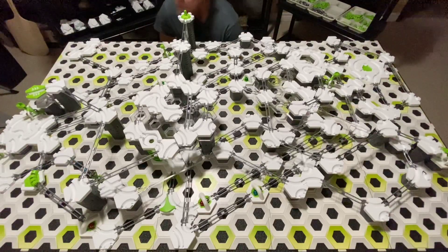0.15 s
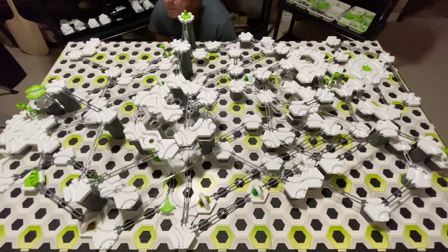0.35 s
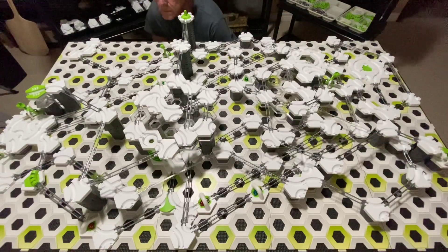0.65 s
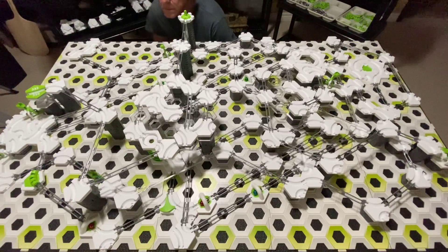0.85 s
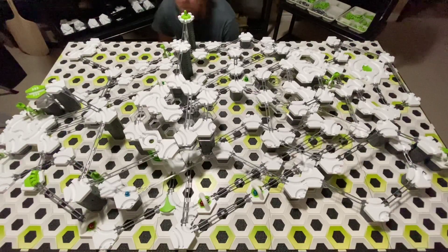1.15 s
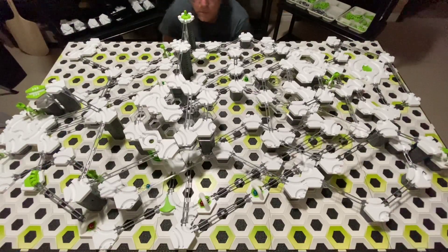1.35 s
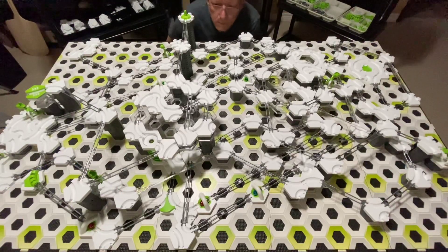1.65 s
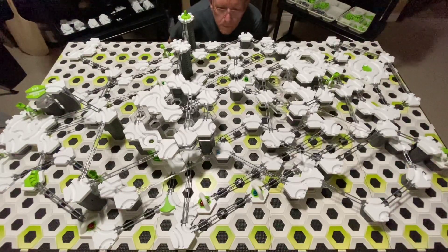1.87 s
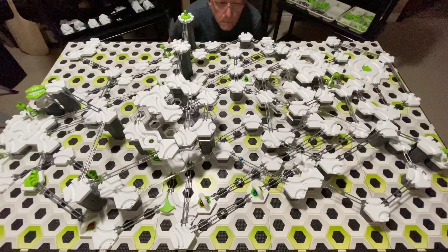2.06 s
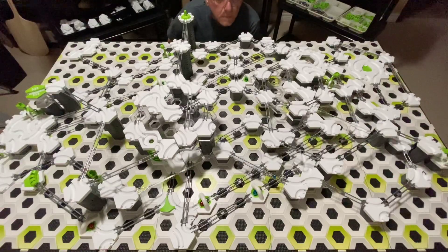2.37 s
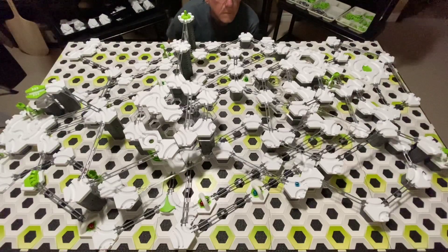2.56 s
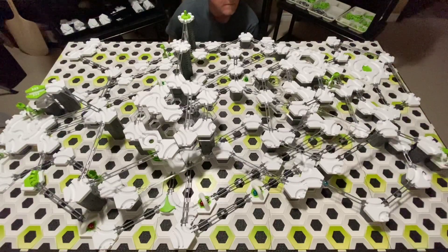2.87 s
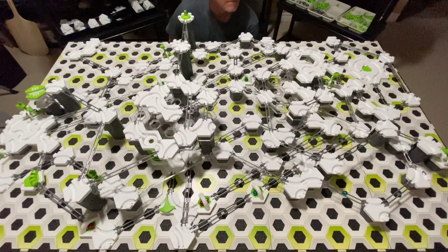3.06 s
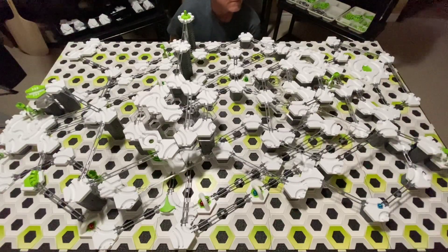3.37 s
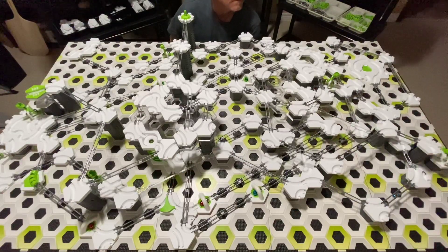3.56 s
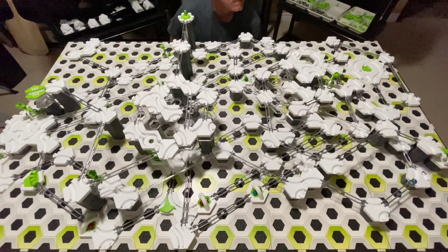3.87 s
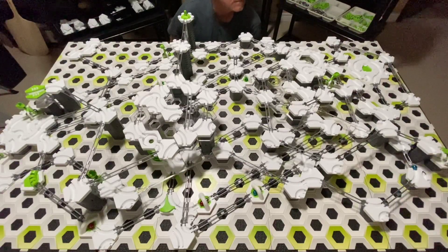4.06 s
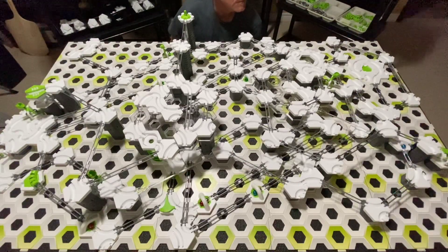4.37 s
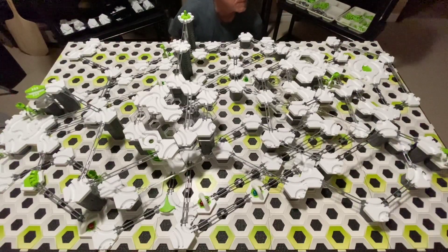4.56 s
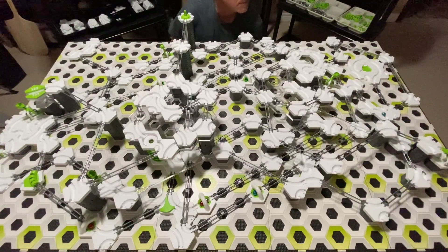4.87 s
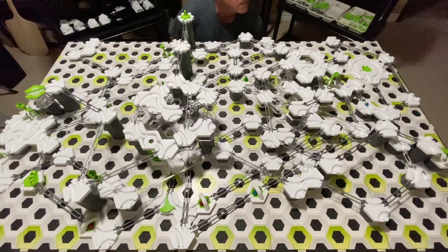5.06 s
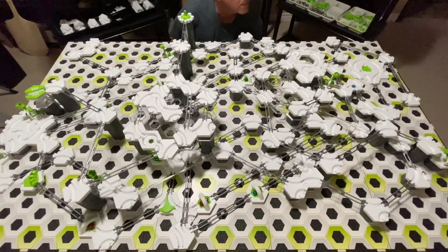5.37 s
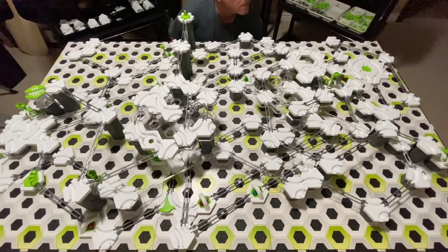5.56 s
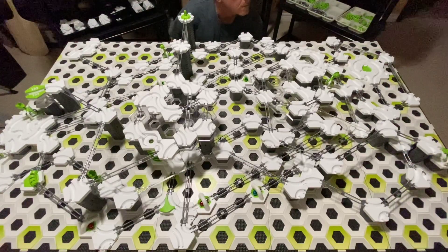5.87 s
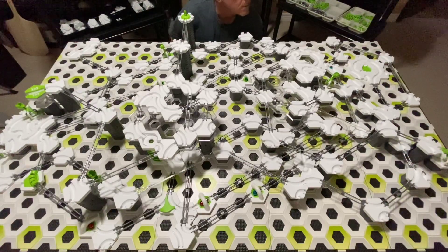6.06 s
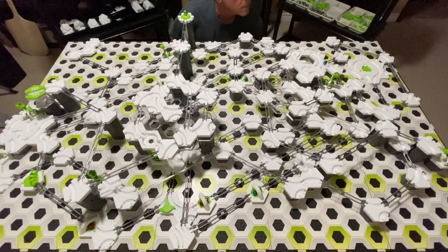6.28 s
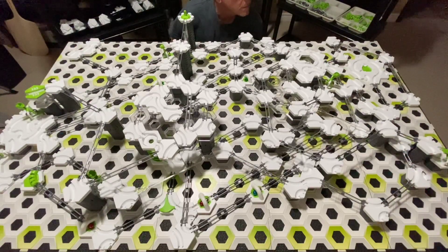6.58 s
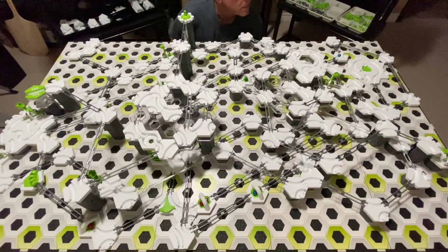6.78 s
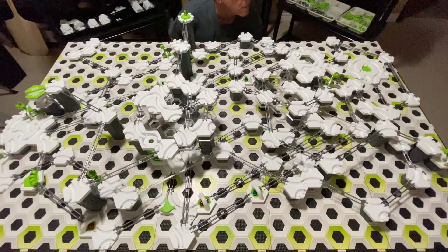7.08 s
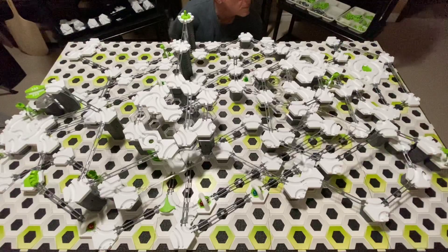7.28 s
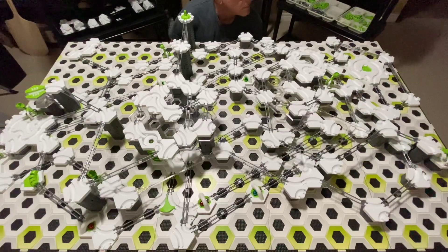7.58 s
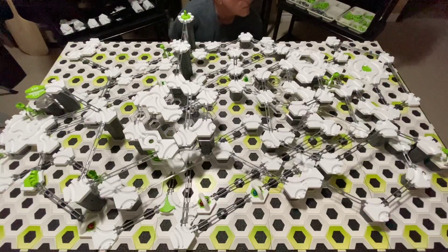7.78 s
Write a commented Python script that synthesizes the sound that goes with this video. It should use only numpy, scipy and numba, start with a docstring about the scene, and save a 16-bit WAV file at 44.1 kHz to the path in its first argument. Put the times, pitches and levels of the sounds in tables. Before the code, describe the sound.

Small steel marbles rattle and roll over hollow plastic track tiles and wire rails, with a sharp clack near one second, indoors.

```python
"""Small steel marbles run over a table-top track of hollow plastic tiles and wire rails in a furnished room.
Rolling is random grit exciting tile cavities, tile walls and rails; on some passes one resonance sings.
Knocks and bounces are short bursts of noise that ring the track's decaying modes, with diffuse reflections.
Passing marbles make the card base drone (noise through broad resonances) and shake the table into a rumble.
A low hum and rumble, also resonant noise, lie under it all, with faint hiss."""
import sys
import numpy as np
from scipy import signal
from scipy.io import wavfile
from scipy.ndimage import uniform_filter1d
from numba import njit

SR = 44100
rng = np.random.default_rng(int(sys.argv[2]) if len(sys.argv) > 2 else 0)


def unload_wav(signal):
    """Save mono or channel-first audio to the path in sys.argv[1] as 16-bit WAV at rate SR, clipped to [-1, 1]."""
    wavfile.write(
        sys.argv[1],
        SR,
        np.round(np.clip(np.atleast_2d(signal).T, -1, 1) * 32767).astype(np.int16),
    )


N = 349713

# Rolling, one list for each stretch of track:
# (time [s], tile cavity level [dB], tile rasp level [dB], rail hiss level [dB])
ROLLING_LEVELS = [
    [(0.0, -69, -63.5, -67), (0.03, -76.5, -71.5, -77.5), (0.28, -80.5, -72, -103)],
    [(0.3, -71, -78, -92), (0.526, -65, -56, -82), (0.83, -83.5, -86, -89)],
    [(0.98, -45, -56, -65), (1.038, -71, -72, -81), (1.3, -61.5, -67.5, -80)],
    [(1.32, -65, -64.5, -81), (1.462, -69.5, -68, -68), (1.89, -64.5, -58, -55.5)],
    [(1.92, -58, -53, -56), (1.956, -57.5, -58, -64), (2.2, -67, -74, -70), (2.47, -66, -72, -71)],
    [(2.49, -43.5, -63, -72), (2.596, -59, -61.5, -77), (2.9, -59, -68.5, -71)],
    [(2.92, -62.5, -67, -81), (3.08, -65.5, -71.5, -75), (3.25, -68.5, -68.5, -77.5)],
    [(3.27, -59.5, -64, -77), (3.52, -64, -68.5, -72.5), (3.7, -70.5, -70, -76), (3.77, -72, -77.5, -84.5),
     (3.83, -75, -77, -86)],
    [(3.85, -56, -61.5, -82), (4.104, -67, -73, -77), (4.62, -65.5, -71, -87.5)],
    [(4.72, -69, -84, -75), (4.74, -58.5, -74, -74), (4.98, -59.5, -72.5, -96)],
    [(5.04, -49, -63, -70), (5.06, -59.5, -70, -82), (5.36, -62.5, -69, -68)],
    [(5.39, -52.5, -67, -67), (5.658, -60.5, -68, -72), (5.73, -83.5, -89, -94)],
    [(5.75, -58.5, -72, -76), (5.88, -87, -81, -78), (5.91, -70, -78, -84)],
    [(5.93, -71, -84.5, -87), (6.19, -71, -93.5, -99), (6.26, -58, -84, -96), (6.44, -70.5, -95.5, -98.5)],
    [(6.47, -56, -90, -93), (6.48, -70, -83.5, -91.5), (7.17, -65.5, -71, -72)],
    [(7.19, -58.5, -62.5, -77.5), (7.52, -77, -87.5, -86.5), (7.65, -77.5, -90, -83),
     (7.69, -75, -80, -80.5), (7.93, -76, -78.5, -72)],
]
# Tile cavities under the marble: (time [s], pitch [Hz])
CAVITY_PITCH = [(0, 1872), (.96, 1888), (1.08, 1740), (1.88, 1414), (2.03, 1294), (2.1, 1520), (2.48, 1556),
                (2.5, 1875), (2.84, 1361), (2.92, 1655), (3.9, 1636), (4.02, 1420), (4.2, 1653),
                (4.6, 1586), (4.8, 1759), (5.1, 1621), (5.92, 1732), (6.04, 1412), (6.93, 1297),
                (7.02, 1720), (7.93, 1541)]
# Wire rails: (time [s], pitch [Hz])
RAIL_PITCH = [(0, 4576), (1.3, 5046), (2.1, 4810), (2.7, 4700), (4.2, 5120), (5.4, 4650), (7.93, 4520)]
# Tile-wall resonances in the rasp: (pitch [Hz], first-stage width [Hz], relative level [dB])
RASP_RESONANCES = [(2570, 450, 6), (2890, 900, 7.5), (3440, 280, -5)]
# Card-base resonances: (pitch [Hz], first-stage width [Hz], relative level [dB])
BASE_RESONANCES = [(274, 76, -2), (358, 129, 3), (458, 220, 0.5), (660, 220, -11.5)]
# Passes that set the card base droning: (start [s], time held from start [s], level [dB])
DRONE_PASSES = [(.38, 0.12, -72.5), (.5, 0.14, -70), (0.919, 0.0086, -45), (0.999, 0.14, -68.5),
                (1.2, 0.094, -84), (1.909, 0.078, -62), (2.491, 0.29, -77.5), (3.302, 0.11, -67),
                (3.39, 0.085, -64.5), (3.919, 0.23, -64.5), (4.38, 0.28, -70), (4.86, 0.31, -70),
                (5.39, 0.18, -67), (5.921, 0.25, -62), (6.46, 0.016, -69.5), (6.749, 0.16, -69.5),
                (7.18, 0.11, -67.5)]
# Hum resonance: (pitch [Hz], first-stage width [Hz], relative level [dB])
HUM_RESONANCES = [(165.7, 16, 0)]
# Hum and rumble: (time [s], hum level [dB], rumble level [dB])
HUM_RUMBLE_LEVELS = [(0, -85, -90.5), (.92, -83, -77.5), (.94, -74, -59), (1.1, -82.5, -86.5),
                     (3.1, -83, -81), (3.35, -73.5, -79), (4.3, -74.5, -74), (5.4, -73.5, -68.5),
                     (6.1, -74, -78), (6.3, -76, -78.5), (7.93, -76, -77.5)]
# Rumble resonances: (pitch [Hz], first-stage width [Hz], relative level [dB])
RUMBLE_RESONANCES = [(59.05, 28, -13), (96, 97, 2)]
# Knocks: (time [s], clack peak [dB], pitch of struck piece [Hz], hollow-tile peak [dB],
# hard-contact treble peak [dB], chatter decay constant before clipping [ms])
KNOCK_EVENTS = [(0.2443, -60, 2980, -70, -88, 2.9), (0.2916, -42.5, 2810, -67, -58, 4.9),
                (0.3067, -40, 3260, -58, -48.5, 6.6), (0.3225, -39.5, 2930, -52.5, -74, 1.8),
                (0.3471, -52, 3250, -54.5, -58, 3.4), (0.3811, -34.5, 2500, -44, -49, 1.1),
                (0.4374, -73, 2400, -49, -80, 4.7), (0.4546, -66, 2400, -60, -68, 0.96),
                (0.475, -36, 3500, -48, -43, 1.6), (0.491, -37.5, 3640, -41.5, -38.5, 2.1),
                (0.503, -35, 2880, -47, -43, 1.8), (0.517, -20.5, 2660, -38, -34, 1.2),
                (0.5216, -36, 2700, -39, -46, 0.61), (0.529, -45, 3000, -55, -42, 1.5),
                (0.538, -54, 2990, -46, -42, 1.6), (0.5523, -49, 2660, -50, -44, 2.8),
                (0.5642, -40, 2800, -44, -41, 0.86), (0.5845, -43, 2720, -56, -54, 3.6),
                (0.6202, -44, 7300, -49, -48, 3), (0.6356, -38.5, 2700, -38, -62, 4.1),
                (0.643, -49, 7140, -60, -62, 1.4), (0.6568, -35.5, 2780, -63, -43, 1.3),
                (0.6742, -44, 3900, -46, -45, 3.4), (0.6867, -42, 2290, -76, -58, 4.6),
                (0.847, -32, 2890, -48, -38.5, 1.25), (0.879, -45.5, 3270, -51.5, -47, 16),
                (0.9239, -15, 4620, -18.5, -18, 1.9), (0.9543, -41, 2500, -44, -48, 3.3),
                (0.9603, -23, 1780, -24.5, -37.5, 2.5), (1.021, -40.5, 2470, -62, -67, 1.7),
                (1.069, -57, 2100, -47, -78, 4.5), (1.1068, -59, 2100, -41.5, -77, 2.7),
                (1.121, -41.5, 2750, -41.5, -68, 2.9), (1.239, -54, 2160, -53, -91, 12),
                (1.3119, -41, 2200, -43.5, -44, 9), (1.327, -37, 4930, -56, -52, 2.3),
                (1.335, -46, 5100, -50, -50, 2.2), (1.3984, -43.5, 5140, -75, -62, 5.8),
                (1.48, -44, 2780, -55, -54, 3.8), (1.5448, -48, 2660, -59, -89, 10),
                (1.5807, -40.5, 4940, -61, -78, 1.7), (1.6016, -47, 2900, -56, -81, 3.3),
                (1.6298, -49.5, 2400, -60, -82, 11), (1.6718, -44, 5170, -57, -82, 3.5),
                (1.6937, -41, 2810, -55.5, -52, 0.87), (1.72, -59, 5320, -61, -74, 1.6),
                (1.7581, -44.5, 2680, -53, -55, 8), (1.8394, -43.5, 5270, -54, -74, 4.1),
                (1.851, -41.5, 5120, -52, -55, 3.8), (1.8706, -39, 2690, -55, -48, 3.2),
                (1.8905, -42, 2770, -57, -46, 3.3), (1.9052, -27, 4520, -35.5, -39.5, 2.3),
                (1.923, -30.5, 2240, -35, -40.5, 3.8), (2.0413, -38.5, 4680, -60, -50.5, 6),
                (2.055, -32.5, 4700, -62, -54, 3.1), (2.097, -41, 4700, -38.5, -48, 5.4),
                (2.101, -23.5, 4750, -63, -32.5, 1), (2.184, -43, 2600, -72, -75, 5.8),
                (2.2673, -46, 4670, -65, -85, 5.5), (2.3081, -43.5, 2480, -54, -61, 4.4),
                (2.355, -48, 2270, -71, -75, 5.1), (2.44, -47, 2460, -62, -72, 3.3),
                (2.481, -33, 4740, -53, -47, 11), (2.4965, -41, 2650, -52, -46, 7.7),
                (2.5019, -36.5, 4900, -63, -45, 5), (2.5424, -45.5, 4670, -48, -59, 7.8),
                (2.5652, -43, 2660, -46.5, -69, 6), (2.5912, -41.5, 2860, -44.5, -79, 5.3),
                (2.6683, -68, 2710, -50, -82, 5.2), (2.7059, -39, 2400, -40.5, -69, 1),
                (2.7225, -28.5, 4420, -40, -45, 1.3), (2.7674, -62, 2480, -52, -80, 3.2),
                (2.8945, -48, 2440, -51, -74, 2.5), (2.9153, -37, 4850, -45, -53.5, 5.8),
                (2.9864, -43, 2500, -51, -51, 9.8), (3.0041, -39, 2430, -43.5, -49, 3.4),
                (3.2589, -35.5, 2340, -46, -47, 6.2), (3.2809, -35.5, 2320, -49, -47, 3.2),
                (3.3233, -42.5, 3580, -45, -82, 10), (3.4428, -46.5, 2700, -44.5, -86, 3),
                (3.466, -46, 2750, -44, -80, 8.6), (3.495, -38, 2600, -44.5, -66, 6),
                (3.564, -37, 4600, -42, -46.5, 6.6), (3.8446, -33.5, 3290, -45, -47, 2.2),
                (3.858, -38, 2660, -54, -54, 7.9), (3.873, -43, 2720, -54, -63, 2.6),
                (3.913, -44.5, 1960, -43.5, -63, 11), (3.9267, -40, 2700, -45.5, -58, 17),
                (4.122, -55, 3050, -48, -80, 7.2), (4.135, -40, 2980, -49, -47, 6.8),
                (4.213, -43, 5070, -64, -46.5, 2.7), (4.2236, -44.5, 3100, -52, -50, 11),
                (4.2947, -46, 3110, -69, -59, 4.5), (4.3104, -44, 5000, -50, -56, 7.7),
                (4.3795, -48, 2440, -46.5, -70, 15), (4.6258, -48.5, 2970, -52, -66, 1.6),
                (4.6431, -42.5, 5200, -42, -46, 12), (4.7254, -50, 2150, -59, -64, 5.3),
                (4.7382, -51, 2200, -48, -55, 2.4), (4.75, -60, 2050, -44.5, -70, 1.4),
                (4.7957, -48, 2280, -57, -54, 7.4), (4.814, -46, 5100, -45.5, -55, 11),
                (4.8264, -41.5, 2150, -43, -50, 2.5), (4.8606, -47.5, 2010, -37, -76, 2),
                (4.876, -59, 2020, -40.5, -80, 4.7), (4.988, -73, 2020, -36.5, -74, 1.8),
                (5.0086, -70, 2050, -46, -79, 2.7), (5.024, -37.5, 2320, -43, -49.5, 3.5),
                (5.0596, -61, 2790, -47, -73, 5.5), (5.1222, -50.5, 2300, -68, -71, 3),
                (5.153, -55, 4740, -54, -76, 2.7), (5.1782, -59, 2170, -46, -83, 2.1),
                (5.195, -48, 2340, -44, -52, 15), (5.2614, -49.5, 2370, -51, -62, 5),
                (5.329, -50, 4720, -49.5, -60, 4), (5.3785, -28.5, 4200, -40.5, -45.5, 1),
                (5.428, -54, 2330, -46, -59, 2.6), (5.4778, -49, 3040, -42.5, -60, 15),
                (5.503, -34, 1980, -38, -50, 1.1), (5.5276, -38.5, 2800, -34, -51, 3.1),
                (5.542, -50, 3300, -52, -50, 1.6), (5.6489, -50, 2320, -48, -54, 2.1),
                (5.745, -42, 2220, -55.5, -52, 0.7), (5.832, -45.5, 4840, -47.5, -55, 4.9),
                (5.9252, -45.5, 3770, -47.5, -84, 1.5), (6.038, -63, 3800, -58, -83, 7.1),
                (6.201, -64, 2440, -36.5, -84, 3.8), (6.2262, -53.5, 2116, -42, -75, 3.9),
                (6.243, -45.5, 3130, -33, -75, 6.1), (6.273, -72, 2080, -56, -81, 1.6),
                (6.342, -80, 2230, -59, -88, 2.3), (6.35, -83.5, 2220, -63, -90, 3.9),
                (6.3648, -88, 2330, -54, -93, 3.6), (6.3985, -79, 2150, -50.5, -89, 1.8),
                (6.433, -89, 2200, -68, -88, 2.5), (6.4593, -47.5, 3230, -43, -55, 8.2),
                (6.5741, -51, 3210, -47.5, -70.5, 3.1), (6.6636, -52.5, 3570, -48, -57.5, 2.2),
                (6.675, -48, 3500, -44.5, -65, 4.6), (6.7273, -51.5, 3080, -47.5, -76, 2.6),
                (6.7464, -45, 2350, -43.5, -73, 6.1), (6.963, -40.5, 4300, -50.5, -51.5, 10.3),
                (6.995, -45.5, 5100, -58, -64, 3.6), (7.0416, -48.5, 3470, -56.5, -77, 3.7),
                (7.1226, -48.5, 3500, -56, -68, 4.1), (7.182, -43, 4300, -41.5, -53, 2.9),
                (7.226, -43.5, 4100, -39.5, -56.5, 7.7), (7.317, -51, 3670, -55, -77, 8.2),
                (7.3333, -44, 4330, -51.5, -66, 14), (7.417, -43.5, 4150, -49.5, -56.5, 3.9),
                (7.558, -68.5, 3600, -64.5, -93.5, 7.8), (7.611, -72, 4270, -65.5, -78, 2.7),
                (7.674, -64, 4790, -65, -85, 5.7), (7.733, -62, 4740, -60, -80, 2.2),
                (7.769, -67, 4500, -78, -90, 1.8), (7.7822, -64, 4130, -73, -91, 3.7),
                (7.855, -58.5, 4600, -59, -87, 3.4)]
# Decaying modes of the track: (pitch [Hz], relative level before scatter [dB], 60 dB decay time [s])
TRACK_MODES = [(328.3, -2.5, 0.038), (446, -9.5, 0.022), (643, 5, 0.022), (937, -4.5, 0.0034),
               (1479, 8, 0.0064), (1580, -5, 0.0065), (1986, -8, 0.0085), (1913, 4.5, 0.0047),
               (2202.6, 16.5, 0.0017), (2530, 8, 0.0015), (3270, -11, 0.014), (3840, -3.5, 0.0018),
               (4440, 3, 0.0025), (5170, 1.5, 0.0047), (4854, -1.5, 0.0025), (5287, -6.5, 0.0029),
               (5860, -8, 0.0038), (6380, 17.5, 0.0046), (6820, 7.5, 0.0091), (7154, 13, 0.0047),
               (8350, -5, 0.0026), (9670, -15, 0.0026)]
# Bands radiated by base, cavities, tile walls and hard contact: (low edge [Hz], high edge [Hz])
RADIATED_BANDS = [(120, 800), (700, 2400), (1900, 5900), (5500, 11500)]
# Bands of the room's reflections: (centre [Hz], 60 dB decay time [s], relative level [dB])
ROOM_BANDS = [(286, 0.062, -23.5), (1480, 0.189, -21.5), (4240, 0.17, -21.5), (8040, 0.18, -20)]
# Passes on which one piece of track sings:
# (start [s], length [s], first pitch [Hz], last pitch [Hz], first level [dB], last level [dB])
SINGING_PASSES = [(0.967, 0.12, 2110, 1830, -51, -52), (0.968, 0.12, 2380, 2080, -54, -60),
                  (0.98, 0.1, 1600, 1600, -59, -54), (1.058, 0.14, 1790, 1570, -52, -69),
                  (1.196, 0.16, 1650, 1790, -75, -72), (1.96, 0.078, 1245, 1250, -65, -57),
                  (2.047, 0.39, 4770, 4800, -69, -71), (2.112, 0.36, 2410, 2420, -62, -68),
                  (2.12, 0.28, 1570, 1500, -61, -73), (2.497, 0.14, 4840, 4730, -61, -68),
                  (2.482, 0.11, 1810, 1790, -51, -71), (2.648, 0.18, 1415, 1570, -52, -56),
                  (2.783, 0.095, 1250, 1230, -49.5, -71), (4.718, 0.37, 2090, 2080, -63, -71),
                  (4.79, 0.17, 1320, 1320, -57, -65), (4.989, 0.053, 1410, 1500, -47, -57),
                  (4.998, 0.056, 1920, 1720, -67, -75), (5.176, 0.087, 1500, 1690, -61, -59),
                  (5.372, 0.2, 1680, 1660, -73, -71), (5.502, 0.25, 1640, 1700, -52, -86),
                  (5.742, 0.15, 1676, 1680, -79, -59), (5.913, 0.32, 1740, 1670, -69.5, -72.5),
                  (5.995, 0.12, 1415, 1420, -63, -62.5), (6, 0.1, 1105, 1130, -72.5, -67),
                  (6.202, 0.099, 880, 886, -58, -58), (6.95, 0.13, 1700, 1670, -66.5, -74),
                  (6.56, 0.18, 1297, 1370, -62, -66), (7.192, 0.053, 1950, 1840, -52, -71),
                  (7.24, 0.25, 1750, 1626, -66.5, -67), (7.673, 0.13, 4540, 4740, -71, -84)]

CAVITY_WANDER, RAIL_WANDER = .08, .015  # pitch wander, as a share of the pitch
DRONE_ATTACK_S, DRONE_FADE_DB_PER_S, DRONE_REST_DB = .0083, 179, -85
TABLE_DB = -17.5  # share of the drone gain that shakes the table into a rumble
PATTER_PER_S = 4
PIECE_T60_S = .008
SINGING_WIDTH = .055  # first-stage width as a share of the first pitch
SINGING_FADE_S = .02  # fall at the end; the rise at the start takes half as long
MIC_HISS_DB, CONVERTER_HISS_DB, TOP_HZ = -93, -104, 11600


def undb(db):
    """Amplitude gain is ten to the power of a twentieth of the level in decibels."""
    return 10 ** (np.asarray(db) / 20)


def unit(x):
    """Root-mean-square normalization: the effective value becomes 1."""
    return x / np.sqrt(np.mean(x ** 2))


def peak(x):
    """Peak normalization: the greatest magnitude becomes 1."""
    return x / np.max(np.abs(x))


@njit
def band_pass(x, hz, width):
    """Second-order resonance as a state-variable filter, whose centre may move every sample."""
    y, band, low = np.empty(len(x)), 0., 0.
    for i in range(len(x)):
        g = np.tan(np.pi * hz[i] / SR)
        k = width / hz[i]
        v = (band + g * (x[i] - low)) / (1 + g * (g + k))
        band = 2 * v - band
        low = low + 2 * g * v
        y[i] = k * v
    return y


def resonances(x, table):
    """Superposition of steady resonances, each two filters in cascade for steep skirts; rms 1."""
    steady = np.ones(len(x))
    total = np.zeros(len(x))
    for hz, width, db in table:
        narrow = band_pass(x, hz * steady, 1. * width)
        total += undb(db) * unit(band_pass(narrow, hz * steady, 2. * width))
    return unit(total)


def ring(x, hz, t60):
    """Damped oscillation of one mode driven by x; a small body radiates no deep bass."""
    radius = np.exp(-np.log(1000) / (t60 * SR))
    angle = 2 * np.pi * hz / SR
    return signal.lfilter([.5, 0, -.5], [1, -2 * radius * np.cos(angle), radius ** 2], x)


def grit(per_s, spread_db):
    """Random impulse excitation: tiny contacts at random moments, most faint and a few strong."""
    chance = rng.random((2, N))
    contact = chance[0] < per_s / SR
    strength = undb(-spread_db * np.log(1 - chance[1]))
    return contact * strength * rng.standard_normal(N)


def wobble(rate, depth_db):
    """Random amplitude modulation: a gain that wanders by an rms depth in dB, at a rate in steps per second."""
    step = int(SR / rate)
    steps = np.repeat(rng.standard_normal(N // step + 1), step)
    return undb(depth_db * unit(uniform_filter1d(steps, step)[:N]))


def rolling(cavity_db, cavity_hz, rasp_db, rail_db, rail_hz):
    """Forced resonance: surface grit under the marbles excites cavities, walls and rails; the roll throbs."""
    throb = wobble(45., 2.3)
    rub = grit(per_s=6000., spread_db=1.8) * throb
    narrow = unit(band_pass(band_pass(rub, cavity_hz, 180.), cavity_hz, 400.))
    broad = unit(band_pass(band_pass(rub, .97 * cavity_hz, 390.), .65 * cavity_hz, 900.))
    cavity = unit(narrow + 3.5 * broad)

    fine = grit(per_s=5000., spread_db=2.4) * throb
    rasp = resonances(fine, RASP_RESONANCES)

    sizzle = grit(per_s=5000., spread_db=2.4) * throb
    wire = unit(band_pass(band_pass(sizzle, rail_hz, 380.), rail_hz, 650.))
    wash = band_pass(band_pass(sizzle, .88 * rail_hz, 1900.), .88 * rail_hz, 2300.)
    wash = unit(band_pass(wash, .9 * rail_hz, 3000.))
    rails = unit(wire + .9 * wash)
    return undb(cavity_db) * cavity + undb(rasp_db) * rasp + undb(rail_db) * rails


def drone_gain(now):
    """Build-up and decay of the card base: it swells as a marble rolls on, holds, and fades after it has left."""
    gain = undb(DRONE_REST_DB)
    for start, held, db in DRONE_PASSES:
        age = np.maximum(now - start, 0)
        fade = undb(db - DRONE_FADE_DB_PER_S * np.maximum(age - held, 0))
        gain = gain + fade * (1 - np.exp(-age / DRONE_ATTACK_S))
    return gain


def base_drone(gain):
    """Forced resonance of a plate: noise drives the broad modes of the card base."""
    return gain * wobble(25., 2.0) * resonances(rng.standard_normal(N), BASE_RESONANCES)


def low_hum(hum_db):
    """Narrow-band noise: one resonance of small width turns noise into a wavering hum."""
    return undb(hum_db) * wobble(7.1, 2.4) * resonances(rng.standard_normal(N), HUM_RESONANCES)


def table_rumble(rumble_db, base_gain):
    """Structure-borne transmission: a share of the drone gain adds to a low resonant rumble."""
    gain = undb(rumble_db) * wobble(17.0, 3.8) + undb(TABLE_DB) * base_gain
    return gain * resonances(rng.standard_normal(N), RUMBLE_RESONANCES)


def patter(cavity_db, rasp_db):
    """Random point process: faint knocks whose levels follow the rolling; rows as in KNOCK_EVENTS."""
    when, size, pitch, length = rng.random((int(PATTER_PER_S * N / SR), 4)).T
    i = (when * N).astype(int)
    clack_db = rasp_db[i] + 6 * (.5 + size)  # 3 to 9 dB over the rasp
    hollow_db, hard_db = cavity_db[i] + 2, clack_db - 28
    return np.transpose([i / SR, clack_db, 2200 + 900 * pitch, hollow_db, hard_db, 1 + 4 * length])


def knocks(blows, cavity_hz):
    """Impact excitation of modes: each blow is a short chatter that rings the track in other proportions."""
    s, clack_db, piece_hz, hollow_db, hard_db, chatter_ms = blows.T
    t = np.arange(2048) / SR
    # a longer chatter also builds up more slowly
    age = 1000 * t / np.clip(chatter_ms, .3, 12)[:, None]
    fade = (1 - np.exp(-age / .061)) * np.exp(-age)
    taper = np.cos(np.pi / 2 * t / t[-1])
    chatter = rng.standard_normal((len(s), len(t))) * fade * taper

    parts = np.zeros((4,) + chatter.shape)  # base, cavities, walls, hard contact
    for hz, db, t60 in TRACK_MODES:
        scatter_db = 3.5 * rng.standard_normal(len(s))
        part = np.searchsorted([700, 2200, 6000], hz)
        parts[part] += undb(db + scatter_db)[:, None] * ring(chatter, hz, t60)
    for k, band in enumerate(RADIATED_BANDS):
        parts[k] = signal.sosfilt(signal.butter(3, band, "band", fs=SR, output="sos"), parts[k])

    out = np.zeros(N + len(t))
    for k in range(len(s)):
        i = int(s[k] * SR)
        thud, hollow, clack, hard = (unit(part[k]) for part in parts)
        # the piece under the marble adds its own pitch
        near = unit(ring(clack, piece_hz[k], .0042))
        piece = unit(ring(chatter[k], piece_hz[k], PIECE_T60_S))
        clack = clack + undb(-5.0) * near + undb(-3.5) * piece
        # so does the cavity below it, with a second, lower resonance
        colour = unit(ring(hollow, cavity_hz[i], .00088))
        cavity = unit(ring(chatter[k], cavity_hz[i], .012))
        under = unit(ring(chatter[k], .63 * cavity_hz[i], .012))
        hollow = unit(colour + undb(-2.5) * cavity + undb(-12.0) * under)
        hollow = hollow + undb(-13.0) * thud
        blow = undb(clack_db[k]) * peak(clack) + undb(hollow_db[k]) * peak(hollow)
        out[i:i + len(t)] += blow + undb(hard_db[k]) * peak(hard)
    return out[:N]


def room(x, gap_s=.0018, count=24):
    """Diffuse reverberation, with a decay time for each band, as convolution with decaying noise."""
    t, out = np.arange(SR // 2) / SR, np.zeros(N + SR)
    # each of the equal time blocks gets its own random tail, so no single pitch rings throughout
    for i in np.array_split(np.arange(N), count):
        tail = np.zeros(len(t))
        for hz, t60, db in ROOM_BANDS:
            noise = unit(band_pass(rng.standard_normal(len(t)), hz + 0 * t, 1. * hz))
            tail += undb(db - 60 * t / t60) * noise / np.sqrt(t60 * SR / 100)
        echoes = signal.fftconvolve(x[i], tail * (t > gap_s))
        out[i[0]:i[0] + len(echoes)] += echoes
    return out[:N]


def singing():
    """Sustained resonance: grit keeps one narrow mode of a tile or rail ringing while the marble rolls over it."""
    out = np.zeros(N)
    rub = grit(per_s=4300.0, spread_db=2.5) * wobble(35., 4.0)
    for start, length, hz0, hz1, db0, db1 in SINGING_PASSES:
        i = np.arange(int(start * SR), min(int((start + length) * SR), N))
        along = np.linspace(0, 1, len(i))
        hz = hz0 + (hz1 - hz0) * along
        width = SINGING_WIDTH * hz0
        edge = np.clip(np.minimum(along * 2, 1 - along) * length / SINGING_FADE_S, 0, 1)
        tone = unit(band_pass(band_pass(rub[i], hz, width), hz, 2. * width))
        out[i] += undb(db0 + (db1 - db0) * along) * edge * tone
    return out


def scene():
    """Linear superposition of rolling, drone, hum, rumble, knocks in the room and singing."""
    now = np.arange(N) / SR
    s, *columns = np.vstack(ROLLING_LEVELS).T
    cavity_db, rasp_db, rail_db = (np.interp(now, s, c) for c in columns)
    cavity_hz = np.interp(now, *np.transpose(CAVITY_PITCH))
    rail_hz = np.interp(now, *np.transpose(RAIL_PITCH))
    # each piece of track has a slightly different pitch
    rolled_cavity_hz = cavity_hz * wobble(9.9, 20 * np.log10(1 + CAVITY_WANDER))
    rolled_rail_hz = rail_hz * wobble(13.0, 20 * np.log10(1 + RAIL_WANDER))
    roll = rolling(cavity_db, rolled_cavity_hz, rasp_db, rail_db, rolled_rail_hz)

    base_gain = drone_gain(now)
    drone = base_drone(base_gain)
    s, hum_db, rumble_db = np.transpose(HUM_RUMBLE_LEVELS)
    hum = low_hum(np.interp(now, s, hum_db))
    rumble = table_rumble(np.interp(now, s, rumble_db), base_gain)

    blows = np.vstack([KNOCK_EVENTS, patter(cavity_db, rasp_db)])
    hits = knocks(blows, cavity_hz)
    return (roll + drone + hum + rumble + hits + room(hits) + singing())[None]


def record(dry):
    """Band limitation and self-noise: the microphone hisses and drops the deep bass; a steep cut of the top
    follows, over a trace of converter hiss."""
    hiss = undb(MIC_HISS_DB) * rng.standard_normal(dry.shape)
    thin = signal.sosfilt(signal.butter(3, 40, "high", fs=SR, output="sos"), dry + hiss)
    cut = signal.sosfilt(signal.cheby2(16, 55, TOP_HZ, fs=SR, output="sos"), thin)
    return cut + undb(CONVERTER_HISS_DB) * rng.standard_normal(dry.shape)


dry = scene()
out = record(dry)
unload_wav(out)
```